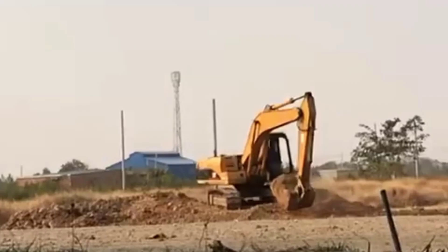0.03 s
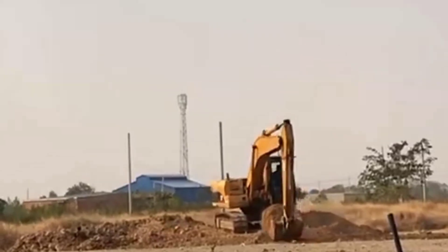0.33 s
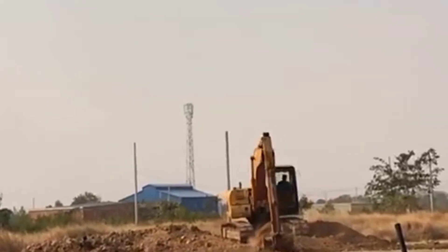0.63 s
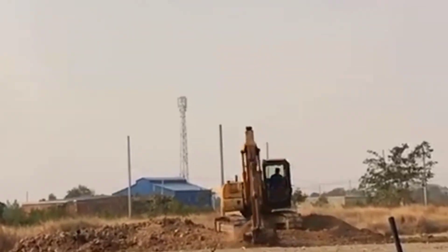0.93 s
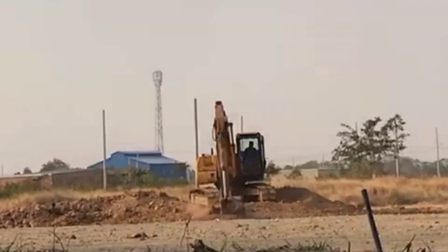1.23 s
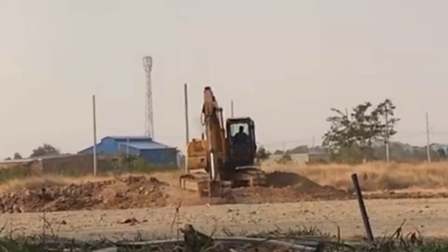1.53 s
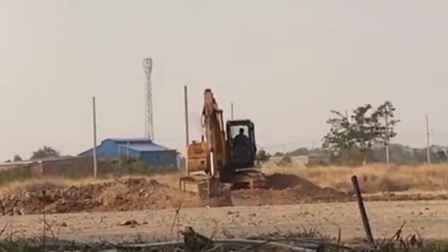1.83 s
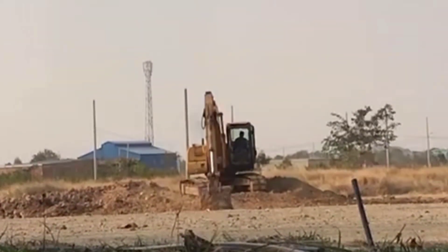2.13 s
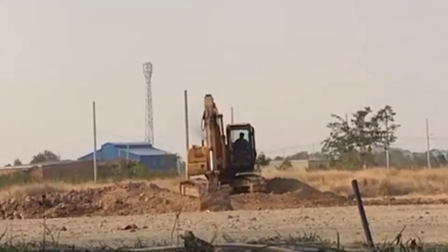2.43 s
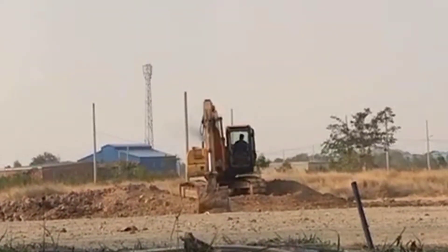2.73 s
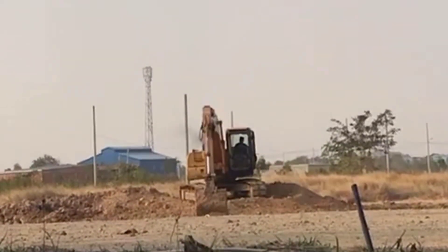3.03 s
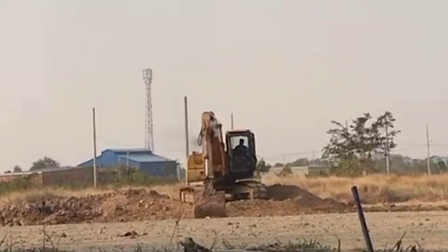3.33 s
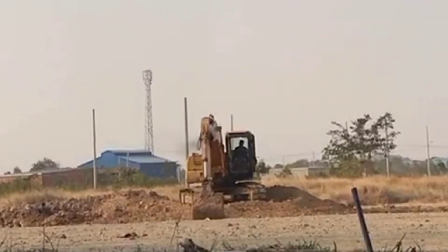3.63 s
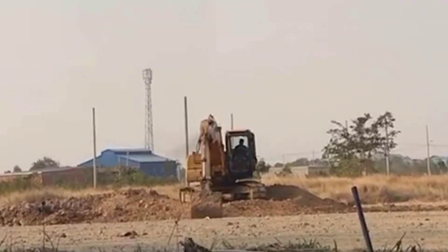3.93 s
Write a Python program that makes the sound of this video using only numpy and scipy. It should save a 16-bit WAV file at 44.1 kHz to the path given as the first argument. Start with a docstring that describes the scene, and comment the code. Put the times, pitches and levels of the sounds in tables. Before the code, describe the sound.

An excavator's diesel runs steadily far from the microphone in an open field, its tracks and bucket rattling. A heavy metal blow rings out roughly once a second, with a few dull thumps, thin bird chirps and light wind.

```python
"""An excavator's six-cylinder diesel rumbles far off across an open field: its firings pulse
through the exhaust, its engine block clatters, and its steel tracks and bucket clank and rattle.
About once a second comes a heavy steel blow, perhaps a pile hammer, drawn out by echoes from the site.
Thin chirps, probably small birds, sound above it, with a few dull thumps below.
Wind hisses faintly in the grass and nudges the microphone."""
import sys
import numpy as np
from scipy import signal
from scipy.fft import rfft, irfft
from scipy.io import wavfile

SR = 44100
rng = np.random.default_rng(int(sys.argv[2]) if len(sys.argv) > 2 else 0)


def inscribe(sig):
    """Save sig as 16-bit PCM at rate SR to the path in sys.argv[1].

    A 1-D sig is mono; a 2-D sig holds one channel per row.
    Samples are clipped to [-1, 1] before scaling.
    """
    pcm = np.round(np.clip(np.atleast_2d(sig).T, -1, 1) * 32767)
    wavfile.write(sys.argv[1], SR, pcm.astype(np.int16))


N = 176400
T = np.arange(N) / SR


def undb(db):
    """Turn decibels into a number to multiply by."""
    return 10 ** (np.asarray(db) / 20)


def unit(x):
    """Scale a sound to an average (rms) level of 1."""
    return x / np.sqrt(np.mean(x ** 2) + 1e-20)


def curve(rows):
    """A volume that glides through (seconds, dB) points."""
    return undb(np.interp(T, *np.array(rows).T))


def colour(x, points):
    """Shape a sound's bass and treble with a filter through (Hz, dB) points."""
    size = 2 * N
    hz, db = np.array(points, float).T
    freqs = np.maximum(np.fft.rfftfreq(size, 1 / SR), 1)
    gain = undb(np.interp(np.log(freqs), np.log(hz), db))
    # These steps make the filter ring only after a sound, never before it.
    cepstrum = irfft(np.log(gain))
    cepstrum[1:N] *= 2
    cepstrum[N:] = 0
    return irfft(rfft(x, size) * np.exp(rfft(cepstrum)))[:N]


def noise(points):
    """Noise of level 1, shaped by (Hz, dB) points."""
    return unit(colour(rng.standard_normal(N), points))


def band(hz, width):
    """Noise of level 1 around one pitch; at 0 Hz, a random wobble that is faster when wider."""
    freqs = np.fft.rfftfreq(N, 1 / SR)
    falloff = 1 + (2 * (freqs - hz) / width) ** 2
    return unit(irfft(rfft(rng.standard_normal(N)) / falloff, N))


def clicks(times, sizes):
    """Single clicks at the given times in seconds."""
    return np.bincount(np.clip(np.asarray(times) * SR, 0, N).astype(int), sizes, N + 1)[:N]


def envelope(start, rise, hold, fade):
    """Rise, hold, then die away. All are in seconds; a fade time is how long a 60 dB drop takes."""
    age = T - start
    return np.clip(age / rise, 0, 1) * np.exp(-np.log(1000) * np.maximum(age - hold, 0) / fade)


def field_echo(x, db, fade):
    """Ground and trees scatter a sound and give it a short, blurred tail."""
    tail = rng.standard_normal(N) * envelope(0, 0.0034, 0, fade)
    return x + undb(db) * signal.fftconvolve(x, tail / np.linalg.norm(tail))[:N]


def ringing_steel(notes, start, hold):
    """Struck steel rings with several notes, a little different each time and blurred by reflections."""
    out = np.zeros(N)
    for hz, db, fade in notes:
        hz = hz * (1 + .004 * rng.standard_normal())
        tone = np.sin(2 * np.pi * hz * T + rng.uniform(0, 2 * np.pi))
        blur = .3 * band(hz, 33)
        out += undb(db) * (tone + blur) * envelope(start, .003, hold, fade)
    return out


def wind():
    """Gusts rumble on the microphone over a faint hiss in the grass."""
    # Each row: time in seconds, level of the rumble in dB.
    gusts = [(0, -41), (.35, -35), (.7, -47), (1.08, -37.5), (1.6, -50.5), (2, -52), (3.0, -42),
             (3.45, -53.5), (4, -44)]
    # Each row of both: frequency in Hz, relative level in dB.
    rumble_shape = [(20, -24.5), (31, -10), (42, -15.5), (75, 0), (120, -11), (250, -43), (1000, -75.5)]
    hiss_shape = [(300, -8.5), (1500, 9), (2800, 6), (4300, 5), (5000, 2.5), (6500, -1), (8900, -5),
                  (9400, -93)]
    rumble = curve(gusts) * noise(rumble_shape)
    hiss_db = -58 + 1.88 * band(0, 26)
    return rumble + undb(hiss_db) * noise(hiss_shape)


def chirps():
    """Thin, rough whistles, probably birds, whose pitch rises and falls in an arch."""
    # Each row: start and length in seconds, level in dB, top pitch in Hz,
    # height of the arch as a share of that pitch, width of the roughness in Hz.
    calls = [(0.119, 0.079, -51, 4430, 0.25, 1310), (0.841, 0.016, -52.5, 6280, 0.015, 302),
             (0.864, 0.015, -63, 6500, .02, 302), (1.369, 0.13, -63.5, 9300, 0.0032, 59.3),
             (2.147, 0.058, -49, 4430, 0.12, 400), (2.308, 0.22, -60, 9020, 0.0026, 99),
             (2.363, 0.043, -50, 9010, 0.0031, 70), (2.453, 0.2, -62, 9340, 0.004, 119),
             (3.254, .035, -53, 4840, 0.052, 1100), (3.294, 0.017, -52, 4470, .02, 600),
             (3.42, 0.026, -52, 5450, .01, 265), (3.475, 0.037, -43, 5430, .01, 260),
             (3.517, 0.19, -58, 5200, 0.027, 397), (3.516, 0.19, -58.5, 6280, 0.015, 267),
             (3.906, 0.083, -44.5, 7130, 0.019, 35)]
    out = np.zeros(N)
    for start, length, db, hz, arch, width in calls:
        progress = np.clip((T - start) / length, 0, 1)
        pitch = hz * (1 - arch * (2 * progress - 1) ** 2) + .28 * width * band(0, 400)
        whistle = np.sin(2 * np.pi * np.cumsum(pitch) / SR)
        rasp = 1 + .7 * band(0, 2 * width)
        swell = np.sqrt(np.abs(np.sin(np.pi * progress)))
        out += undb(db) * swell * whistle * rasp
    return out


def thumps():
    """Dull thumps, each just a few swings of a low tone."""
    # Each row: start in seconds, peak level in dB, pitch in Hz, length in seconds.
    bumps = [(0.298, -24.5, 76.4, 0.082), (1.038, -35, 69.3, 0.077), (1.045, -25, 361, 0.027),
             (1.312, -15.5, 121, 0.017), (3.439, -19.5, 117, 0.016)]
    out = np.zeros(N)
    for start, db, hz, length in bumps:
        age = T - start
        swell = np.sin(np.pi * np.clip(age / length, 0, 1)) ** 2
        out += undb(db) * swell * np.sin(2 * np.pi * hz * age)
    return out


def rattles():
    """Loose steel on the tracks and bucket chatters briefly around one pitch."""
    # Each row: start in seconds, level in dB, middle pitch in Hz, fade time in seconds.
    shakes = [(.98, -46, 1240, 0.82), (1.246, -32, 1070, 0.23), (1.781, -52, 2280, 0.44),
              (.191, -36, 674, 0.26), (0.19, -43.5, 1710, 0.22), (2.36, -42.5, 1520, 0.27),
              (3.107, -51.5, 4430, 0.037), (3.125, -57, 4430, 0.49), (3.312, -49.5, 3660, 0.3)]
    chatter = undb(1.5 * band(0, 160))
    return chatter * sum(undb(db) * band(hz, .35 * hz) * envelope(start, .003, 0.0043, fade)
                         for start, db, hz, fade in shakes)


def clanks():
    """Each knock of the bucket is a short, rough crunch that sets its steel plate ringing."""
    # Each row: start in seconds, level in dB.
    knocks = [(.785, -37), (.834, -43), (1.079, -44)]
    # Each row: pitch in Hz, relative level in dB, fade time in seconds.
    plate_notes = [(690, 1, .25), (1205, 0, .45), (1690, -5, .25)]
    out = np.zeros(N)
    for start, db in knocks:
        ring = ringing_steel(plate_notes, start, hold=0)
        crunch = band(1400, width=900) * envelope(start, rise=.003, hold=0, fade=.25)
        out += undb(db) * (ring + crunch)
    return out


def blows():
    """Each heavy blow is a dull crack with echoes, a burst of noise, a scattered tail and ringing steel."""
    # Each row: start in seconds, overall gain in dB, amount of ringing, gain of crack and burst in dB.
    strikes = [(0.117, -4.5, .8, -3), (1.1832, -2.5, 0.97, 3), (2.2785, 0.5, 0.95, -1), (3.3965, 1, 1, -.5)]
    # Each row: delay in seconds, level in dB compared with the direct crack.
    echoes = [(.0068, 2), (0.09, -4.5)]
    # Each row: pitch in Hz, relative level in dB, fade time in seconds.
    steel_notes = [(342, -1, .33), (479, -1, .3), (567, 1, 1.15), (605, -4, .39), (708, -2.5, .6),
                   (875, -6, .5), (1040, -2.5, 1.1), (1108, -5.5, .7), (1290, -10, .8), (1560, -10, .55),
                   (1728, -14, .8)]
    # Each row of both: frequency in Hz, relative level in dB.
    crack_shape = [(30, -14), (80, 9.5), (150, 21), (260, 12.5), (520, 5), (850, -3), (1300, -2.5),
                   (2200, -32.5), (9000, -52.5)]
    tail_shape = [(30, 8), (70, 6.5), (170, 1.5), (300, -13), (600, 4), (800, -4.5), (1150, -4.5),
                  (1400, -20.5), (1750, -15.5), (2100, -23), (3200, -27), (5000, -37), (9000, -55)]
    delays, echo_db = np.array([(0, 0)] + echoes).T
    out = np.zeros(N)
    for start, db, ringing, crack_db in strikes:
        crack = colour(clicks(start + delays, undb(echo_db)), crack_shape)
        crack = undb(-16.5) * crack / np.abs(crack).max()
        burst = undb(-30) * noise(crack_shape) * envelope(start, rise=0.00049, hold=0.0013, fade=0.54)
        tail = undb(-31) * noise(tail_shape) * envelope(start, rise=0.004, hold=0.12, fade=0.62)
        ring = ringing * undb(-33) / 2 * ringing_steel(steel_notes, start, hold=0.12)
        out += undb(db) * (undb(crack_db) * (crack + burst) + tail + ring)
    return out


def firings(turns):
    """The cylinders fire three times per shaft turn, each a little off in timing and strength."""
    # The relative strength of each of the six cylinders in dB, in firing order.
    cylinder_db = [-1.5, 0.5, 5.5, -2, -1, 4]
    count, jitter_s, scatter_db = 300, .0008, 4.5
    times = np.interp(np.arange(count) / 3, turns, T, right=N)  # firings past the end stay silent
    timing, strength = rng.standard_normal((count, 2)).T
    db = np.resize(cylinder_db, count) + scatter_db * np.minimum(strength, 1)
    return clicks(times + jitter_s * timing, undb(db))


def exhaust_tones(shaft_angle):
    """The exhaust hums with wavering tones at whole multiples of the shaft's speed."""
    # Each row: cycles per shaft turn, level in dB.
    tones = [(2, -49.5), (3, -45), (6, -43), (10, -48)]
    out = np.zeros(N)
    for multiple, db in tones:
        level = undb(db + 2.5 * band(0, 5)) * np.sqrt(2)
        phase = round(multiple) * shaft_angle + .5 * band(0, 25) + rng.uniform(0, 2 * np.pi)
        out += level * np.sin(phase)
    return out


def engine():
    """The diesel's firings drive the exhaust, its block clatters with the shaft and its panels ring."""
    # Each row of both: frequency in Hz, relative level in dB.
    exhaust_shape = [(25, -41), (45, -4), (70, -8), (95, -2.5), (135, 0), (220, -5.5), (340, -7.5),
                     (460, -18.5), (9000, -76)]
    clatter_shape = [(40, -29), (90, -19), (150, 2), (260, -1.5), (360, -7), (460, -9.5), (570, -10),
                     (780, -13.5), (1020, -15), (1350, -17.5), (1700, -22.5), (2100, -30), (4000, -38.5),
                     (9000, -63.5)]
    # A low drone grows and a hum comes and goes. Each row of both: time in seconds, level in dB.
    drone_levels = [(2.1, -63), (2.5, -48), (3.1, -43.5), (4, -41)]
    hum_levels = [(.6, -45), (2.05, -60), (2.27, -27), (2.5, -40.5), (2.9, -31), (3.3, -61)]
    # Each row: pitch in Hz, width in Hz, level in dB.
    panel_notes = [(238, 72, -51.5), (353.4, 31, -49.5), (569.5, 44, -51), (1004, 87, -52)]
    shaft_hz, wander = 22.45, .007
    turns = np.cumsum(shaft_hz * (1 + wander * band(0, 4.08))) / SR
    angle = 2 * np.pi * turns
    pulses = firings(turns)
    tones = exhaust_tones(angle)
    throb = 1 + .07 * np.cos(angle)
    fluttering_noise = rng.standard_normal(N) * undb(0.5 * band(0, 34))
    clatter = undb(-36.5) * unit(colour(fluttering_noise * throb, clatter_shape))
    drone = curve(drone_levels) * np.sqrt(2) * np.sin(2 * np.pi * 58.2 * T)  # beats against the engine
    hum = curve(hum_levels) * np.sin(8 * angle + .5 * band(0, 14))
    panels = sum(undb(db) * band(hz, width) for hz, width, db in panel_notes)
    scattered_pulses = field_echo(pulses, db=1, fade=0.12)
    exhaust = undb(-37) * unit(colour(scattered_pulses, exhaust_shape))
    return exhaust + tones + clatter + drone + hum + panels


def scene():
    """All the sounds meet at one microphone."""
    site = engine() + blows() + clanks() + rattles() + thumps()
    birds = field_echo(chirps(), db=-7, fade=.25)
    return (site + birds + wind())[None]


def record(dry):
    """The sound fades in quickly; the deepest bass and the highest treble are cut."""
    low_hz, top_hz, start_s = 31, 9550, 0.033
    bass_cut = signal.butter(4, low_hz, "high", fs=SR, output="sos")
    treble_cut = signal.ellip(10, .2, 70, top_hz, fs=SR, output="sos")
    fade_in = np.clip((T - start_s) / 0.016, 0, 1)
    return signal.sosfilt(treble_cut, signal.sosfilt(bass_cut, dry) * fade_in)


dry = scene()
out = record(dry)
inscribe(out)
```